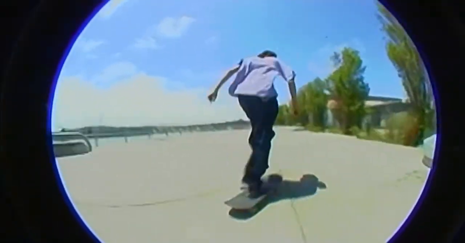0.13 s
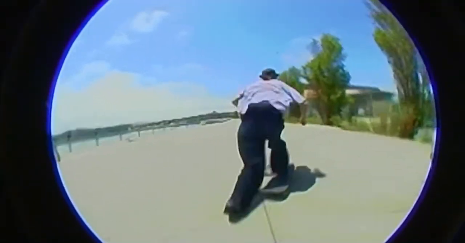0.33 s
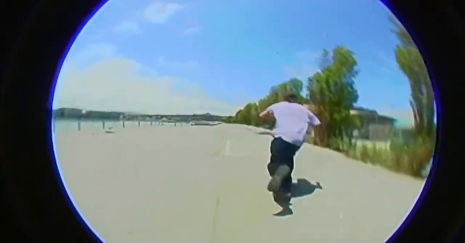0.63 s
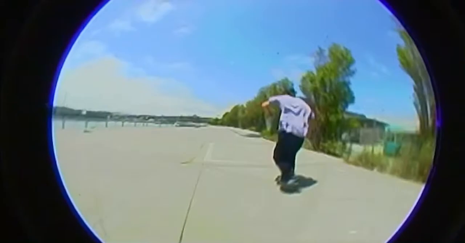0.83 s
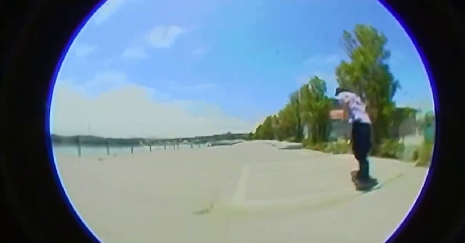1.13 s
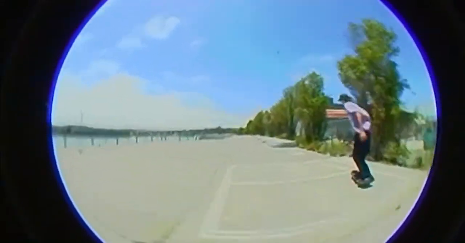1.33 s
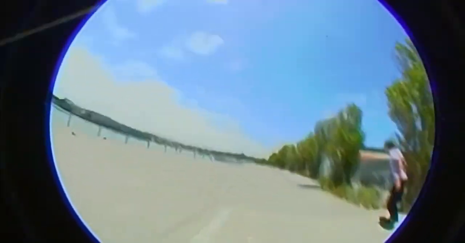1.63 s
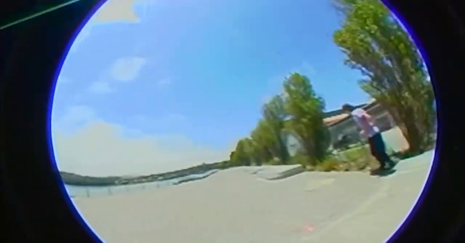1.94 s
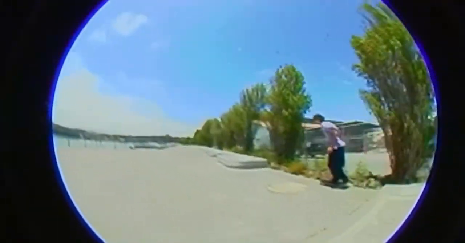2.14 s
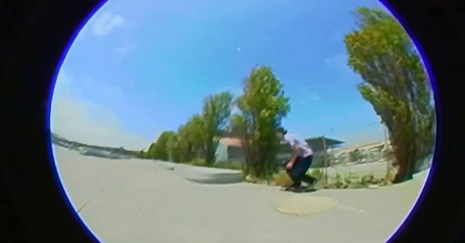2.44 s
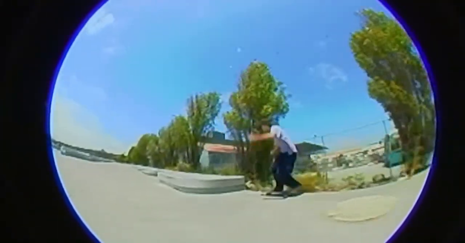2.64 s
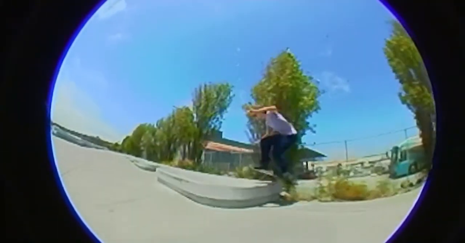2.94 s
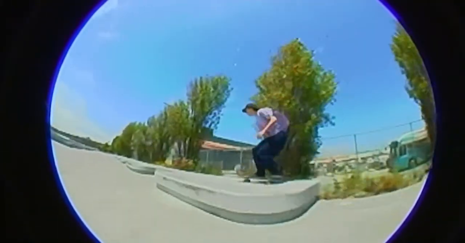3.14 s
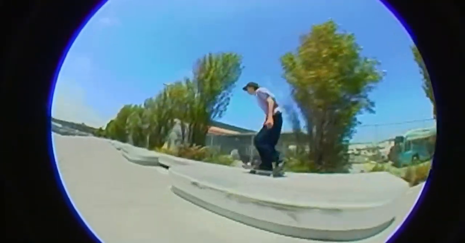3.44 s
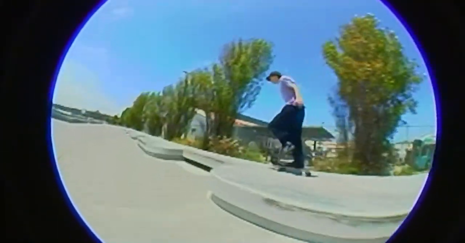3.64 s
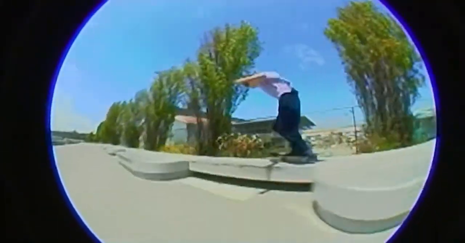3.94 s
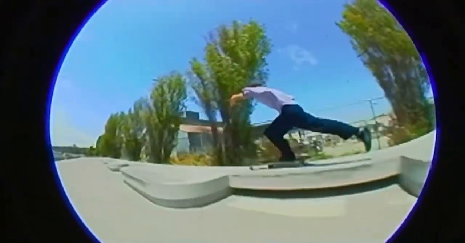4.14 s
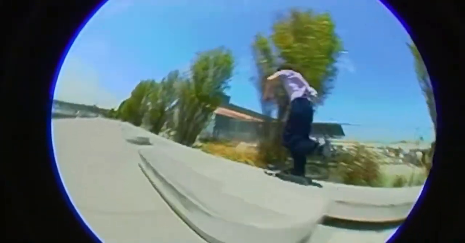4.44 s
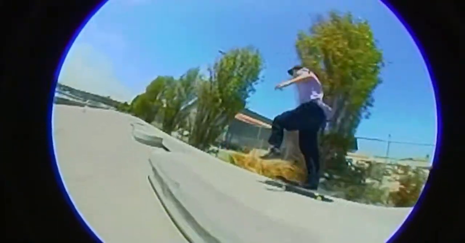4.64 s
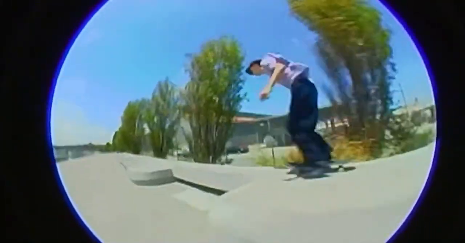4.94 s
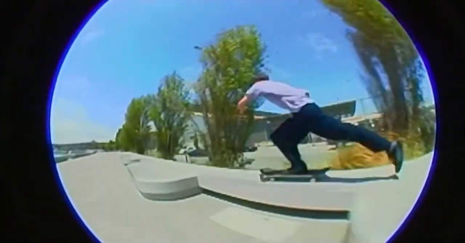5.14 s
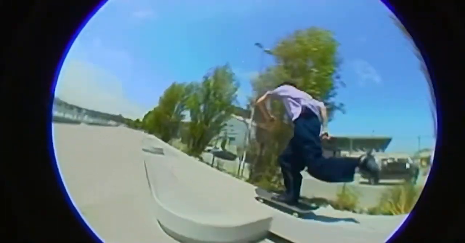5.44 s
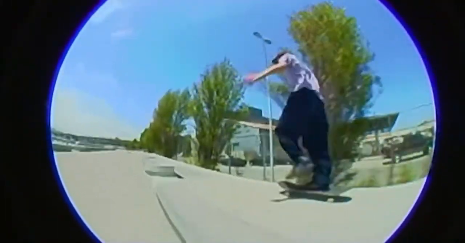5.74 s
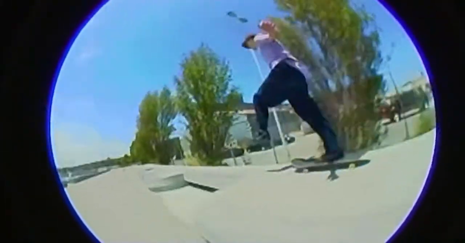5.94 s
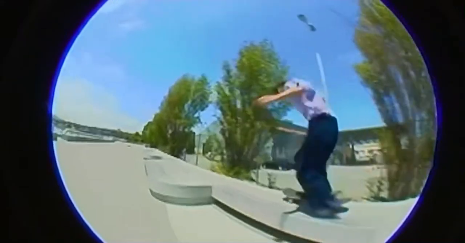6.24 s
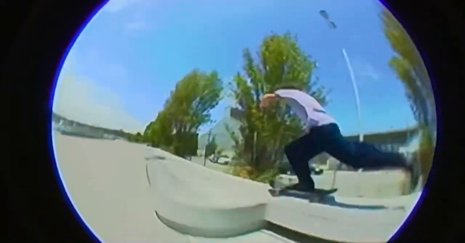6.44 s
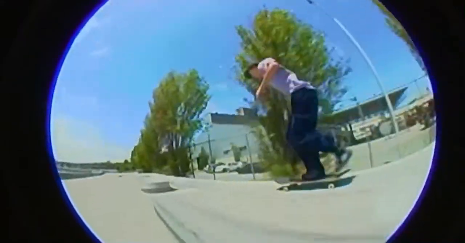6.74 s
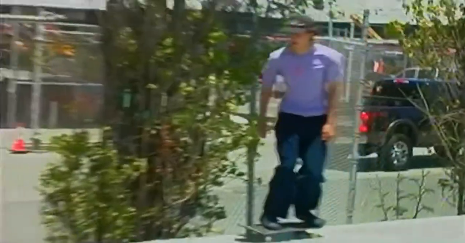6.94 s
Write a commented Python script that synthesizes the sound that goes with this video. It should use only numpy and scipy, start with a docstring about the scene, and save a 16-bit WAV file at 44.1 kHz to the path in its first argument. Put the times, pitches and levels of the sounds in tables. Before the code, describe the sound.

A close, moving microphone outdoors follows a skateboard on rough concrete, slightly to its right. From 0 to 1.4 s, low wind gusts thump while wheels drum boomily on a slab, with thin hiss, loose rattling, a few woody knocks and short metallic chirps; a joint strikes near 0.8 s. At about 1.5 s the board hops, the rumble drops out briefly, and a tight burst of loud slaps lands on a ledge. Knocks continue to 2.5 s, and a gritty surge peaks near 2.3 s as the hollow drone climbs to a growl. A lull follows, then clacks around 2.7 and 3.0 s. Another strong surge swells near 3.8 s, with knocks to 4.0 s. From 4.2 s double joint clacks come often, with a surge at 4.7 s and a hard, bright crack at 5.4 s. More pushes and clacks follow 6 s, with heavy pairs near 6.8 s and a last knock at 7.0 s.

```python
"""Outdoors on rough concrete, a microphone moves beside a rolling skateboard, the board slightly to its right.
First, gusts thump the microphone and the board drums over a slab; at about 1.5 s it hops and slaps onto a ledge.
Then it is pushed along the ledge as the roll surges and its drone climbs; from 4.2 s joints clack often again.
Grains of noise through resonances make the roll, short pushes through them the blows, sagging sines the chirps.
Filtered noise makes the air throughout, and the recorder rounds off the loudest peaks."""
import sys
import numpy as np
from scipy.fft import rfft, irfft, next_fast_len
from scipy.io import wavfile
from scipy.ndimage import uniform_filter1d, map_coordinates

SR = 44100
rng = np.random.default_rng(int(sys.argv[2]) if len(sys.argv) > 2 else 0)


def transcribe(u):
    """Save the signal u as a 16-bit wav file named by the first command-line argument.

    u: samples, shape (n,) or (channels, n), limited to [-1, 1]; the rate is SR.
    q: integer samples, one column per channel.
    """
    v = np.clip(np.atleast_2d(u).T, -1, 1)
    q = np.round(v * 32767).astype(np.int16)
    wavfile.write(sys.argv[1], SR, q)


N = 312228  # samples


def amp(db):
    """Decibels to gain."""
    return 10 ** (np.asarray(db) / 20)


def unit(x):
    """x at rms 1."""
    return x / np.sqrt(np.mean(x ** 2) + 1e-20)


def blow(x):
    """x scaled to the energy of 10 ms at rms 1."""
    energy = np.mean(np.sum(x ** 2, -1))
    return x / np.sqrt(energy / (SR / 100))


def noise_pair():
    """Two unrelated channels of white noise."""
    return rng.standard_normal((2, N))


def shape(points, hz):
    """Gain of a (Hz, dB) spectrum, read on a log frequency axis."""
    f, db = np.transpose(points)
    return amp(np.interp(np.log(hz + 1), np.log(f + 1), db))


def body(modes, hz, sign=-1):
    """Causal response of resonances; the default alternates their signs, sign=1 starts them in step."""
    total = 0
    for k, (centre, width, db) in enumerate(modes):
        resonance = 1j * hz * width / (centre ** 2 - hz ** 2 + 1j * hz * width)
        total = total + sign ** k * amp(db) * resonance
    return total


def curves(rows):
    """One value per sample for each column after the time."""
    s, *cols = np.transpose(rows)
    return [np.interp(np.arange(N) / SR, s, c) for c in cols]


def wobble(rate):
    """A smooth random curve, rate knots a second."""
    knots = rng.standard_normal(int(N * rate / SR) + 4)
    return map_coordinates(knots, [np.arange(N) * rate / SR])


def swell(s, rise, fall):
    """A smooth hump of height 1 at time s; rise and fall are its half lengths to 1/e."""
    t = np.arange(N) / SR - s
    return np.exp(-(t / np.where(t < 0, rise, fall)) ** 2)


def filtered(x, response):
    """x times a response of frequency."""
    n = x.shape[-1]
    m = next_fast_len(n + n // 2)
    return irfft(rfft(x, m) * response(np.fft.rfftfreq(m, 1 / SR)), m)[..., :n]


def stereo(pair, side_db):
    """Left and right from a shared and a differing part."""
    mid, side = pair[0], amp(side_db) * pair[1]
    return np.array([mid + side, mid - side])


def grains(rate, spread_db):
    """Two unrelated trains of tiny impacts of uneven size, rate a second."""
    hit = rng.random((2, N)) < rate / SR
    size = amp(spread_db * rng.standard_normal((2, N)))
    return hit * rng.standard_normal((2, N)) * size


def drifting(x, share, rate):
    """x with its pitch wandering by about this share, at rate knots a second."""
    clock = np.cumsum(1 + share * wobble(rate)) % (N - 1)
    return np.array([np.interp(clock, np.arange(N), side) for side in x])


def band(hz, width_hz):
    """A band of noise of rms 1 on a moving centre, its amplitude halved width_hz to either side."""
    i, q = filtered(noise_pair(), lambda f: 1 / (1 + (f / width_hz) ** 4))
    phase = 2 * np.pi * np.cumsum(hz) / SR
    return unit(i * np.cos(phase) + q * np.sin(phase))


def add(track, s, sound):
    """Mix a sound into the track at time s."""
    part = track[..., max(round(s * SR), 0):][..., :sound.shape[-1]]
    part += sound[..., :part.shape[-1]]


# air at the microphone, before its random wobble: time_s, level_db
AIR_LEVEL = [(0, -35.5), (1.45, -37), (2.5, -46), (3.5, -40), (4.0, -46), (4.6, -35.5), (5.0, -48),
             (5.8, -41), (7.08, -52)]
# gusts that thump on the microphone: peak_s, level_db (rms over 10 ms)
GUSTS = [(.092, -21), (.565, -19.5), (.725, -23), (.97, -22), (1.31, -24), (1.45, -24.5), (5.32, -26)]
# colour of the air and of the gusts: frequency_hz, relative_db
AIR = [(10, 0.0), (25, -2.5), (60, 0.5), (110, 2.0), (200, -8), (400, -64.0)]
THUMP = [(12, -10), (30, 10.0), (75, 15.5), (200, -56.0)]


def wind():
    """Moving air buffets the microphone: wavering low noise, with brief humps of deep noise as gusts."""
    level = amp(curves(AIR_LEVEL)[0] + 2.6 * wobble(14))
    air = filtered(stereo(noise_pair(), side_db=-10), lambda hz: shape(AIR, hz))
    thump = filtered(stereo(noise_pair(), side_db=-14), lambda hz: shape(THUMP, hz))
    gusts = sum(amp(db) * blow(thump * swell(s, 0.027, 0.027)) for s, db in GUSTS)
    return unit(air) * level + gusts


# colour of the thin top hiss: frequency_hz, relative_db
FIZZ = [(11000, -28), (12800, -2.5), (14600, -6), (15400, 11.5), (16000, -16)]


def fizz(board):
    """A thin, very high hiss swells with the loudness of the board in the left channel."""
    loudness = np.sqrt(np.abs(uniform_filter1d(board[0] ** 2, size=500)))  # over 11 ms
    noise = filtered(stereo(noise_pair(), side_db=-2.5), lambda hz: shape(FIZZ, hz))
    return amp(-26.0) * loudness * unit(noise)


# the rumble drops for a moment, in hops or after loud blows: middle_s, half_length_s, rumble_depth_db
LULLS = [(0, 0.067, 6), (0.816, 0.039, 3), (1.564, 0.023, 16.5), (2.544, 0.11, 8.5), (3.063, 0.036, 2.5),
         (3.292, 0.063, 2), (4.025, 0.11, 7), (5.127, 0.086, 5.5), (6.166, 0.072, 3.5), (6.997, 0.063, 4)]
# the roll swells after a lull, the more the longer and deeper it was
REBOUND_DELAY_S, REBOUND_HALF_S = 0.21, 0.09


def rebound():
    """A swell after each lull, in dB s: the lull's depth times its half length."""
    return sum(db * half * swell(s + REBOUND_DELAY_S, REBOUND_HALF_S, REBOUND_HALF_S)
               for s, half, db in LULLS)


# the rider bears down and the roll surges: peak_s, grit_rise_db, drone_rise_db
SURGES = [(1.46, 2, -9), (2.28, 9.5, 6), (2.36, 3.5, 5.5), (2.92, 3.5, -1), (3.17, -0.5, 8.5),
          (3.45, 4, -1), (3.6, 5.5, 2.5), (3.771, 8, 9), (4.709, 5, 10), (6.04, 3, 5), (6.24, 4.5, 1),
          (6.43, 3, -8)]
# dips of the treble, where grit loses 1.35 times the hiss's depth: middle_s, half_length_s, hiss_depth_db
TREBLE_DIPS = [(1.014, 0.066, 6), (1.217, 0.065, 4), (1.688, 0.075, 4.5), (2.044, 0.12, 4.5),
               (2.475, 0.088, 5.5), (3.267, 0.07, 2.5), (4.41, 0.068, 3), (5.807, 0.097, 1),
               (6.56, 0.054, 3.5)]
# scuffs that lift the hiss: middle_s, half_length_s, rise_db
SCUFFS = [(.38, .09, 3.8), (5.28, .07, 3.3)]
# wheel hiss changing with the ground, before a 1 dB cut in the mix: time_s, level_db
HISS_LEVEL = [(0, -43.5), (1.45, -42.5), (2.1, -49), (3.2, -48.5), (4.3, -45.5), (7.08, -46)]
RUMBLE_DB, GRIT_DB = -24.5, -47  # steady rolling, before lulls, surges and bumps
LULL_GRIT, LULL_HISS = 0.78, 0.42  # dB lost for each dB of rumble
SURGE_RISE_S, SURGE_FALL_S = 0.066, 0.054
SURGE_RUMBLE, SURGE_HISS = 0.16, 0.24  # dB gained for each dB of grit
REBOUND_RUMBLE = 1.6  # dB for each dB s of rebound


def roll_levels():
    """Rumble, grit and hiss in dB follow the lulls, rebounds, surges, treble dips and scuffs of the roll."""
    lull = sum(db * swell(s, half, half) for s, half, db in LULLS)
    surge = sum(db * swell(s, SURGE_RISE_S, SURGE_FALL_S) for s, db, _ in SURGES)
    scuff = sum(db * swell(s, half, half) for s, half, db in SCUFFS)
    treble_dip = sum(db * swell(s, half, half) for s, half, db in TREBLE_DIPS)
    rumble_db = RUMBLE_DB - lull + SURGE_RUMBLE * surge + REBOUND_RUMBLE * rebound()
    grit_db = GRIT_DB - LULL_GRIT * lull + surge - 1.35 * treble_dip
    hiss_db = curves(HISS_LEVEL)[0] - LULL_HISS * lull + SURGE_HISS * surge - treble_dip + scuff
    return rumble_db, grit_db, hiss_db


def rattle():
    """Loose washers in the trucks tick: random kicks gate resonant noise, louder when the grit is louder."""
    kicks = np.abs(grains(80, spread_db=2.0)[0])
    ticks = filtered(kicks, lambda hz: 1 / (1 + 1j * hz / 50))  # each kick dies away in a few ms
    metal = filtered(stereo(noise_pair(), side_db=0.0), lambda hz: body([(2700, 1360, 0)], hz) ** 2)
    _, grit_db, _ = roll_levels()
    return unit(metal * ticks) * amp(grit_db - 10.0)


# rings and chirps of the trucks: start_s, starting_pitch_hz, level_db (rms over 10 ms), t60_s
CHIRPS = [(0.221, 1850, -29, 0.07), (.226, 3490, -37.5, 0.052), (.262, 2600, -33.5, 0.029),
          (1.763, 2740, -32.5, 0.014), (2.731, 3400, -36, 0.058), (3.011, 1980, -30.5, 0.02),
          (3.231, 1215, -25, 0.023), (4.321, 3090, -32, .02), (5.047, 2800, -37, 0.039),
          (5.361, 1966, -27, 0.03), (5.3612, 4030, -36, 0.013), (5.451, 3370, -27.5, 0.01),
          (6.009, 2680, -40, 0.018), (6.068, 2440, -26.5, 0.011), (6.94, 2400, -33.5, 0.012)]


def chirps():
    """A truck sticks and slips: a short ring, its phase roughened at random, sags in pitch."""
    track, t = np.zeros(N), np.arange(SR // 8) / SR
    for s, hz, db, t60 in CHIRPS:
        roughness = .16 * np.cumsum(rng.standard_normal(len(t)))  # radians
        tone = np.sin(2 * np.pi * hz * t * (1 - 0.82 * t) + roughness)
        ring = tone * amp(-60 * t / t60) * (1 - np.exp(-t / (0.08 * t60)))
        coloured = filtered(ring, lambda f: body([(hz, 900, 0)], f))
        add(track, s, amp(db) * blow(coloured))
    return track


# joints in the concrete, struck by front then rear wheels (the pair at 6.854 s comes as he pushes), # levels as
# rms over 10 ms; the mix adds 2 dB to clacks and 3 dB to cracks: start_s, rear_delay_s, # front_knock_db,
# rear_knock_db, clack_db, crack_db, rear_clack_and_crack_over_front_db, knock_centre_hz
JOINTS = [(0.764, 0.092, -13, -25, -40.5, -47, 0, 570), (1.063, 0.063, -28, -23, -33, -44.5, 3, 630),
          (4.209, 0.11, -20.5, -21, -32.5, -31.5, -1, 600), (4.617, 0.102, -17.5, -17, -32, -47, -1, 610),
          (4.975, 0.067, -36, -30, -27, -35, -0.5, 560), (5.3615, 0.088, -11, -24, -26.5, -32.5, 1, 730),
          (6.067, 0.076, -35, -26, -27.5, -35.5, 2, 710), (6.399, 0.086, -26, -28, -35.5, -38.5, -3, 620),
          (6.7335, 0.0915, -15, -17, -31, -49, -4, 570), (6.854, 0.082, -14.5, -12.5, -31, -43, -2, 644)]
# single blows of board and feet, and wheel contacts each with its own levels (front and rear wheels # over a
# joint at 2.349 and 2.43 s), with the same levels and additions: # start_s, knock_db, clack_db, crack_db,
# knock_centre_hz
BLOWS = [(0.098, -20.5, -38.5, -56, 620), (0.325, -37, -38, -42, 525), (0.937, -19.5, -48, -52, 655),
         (1.416, -27, -34.5, -45, 550), (1.467, -21, -40.5, -52, 620), (1.5105, -10, -24.5, -38, 565),
         (1.561, -13, -34, -45, 614), (1.5895, -15, -34.5, -46, 665), (1.597, -19, -50, -57, 680),
         (1.793, -24, -44, -45, 690), (1.9367, -16, -41, -52, 620), (2.077, -16.5, -33, -49, 590),
         (2.349, -16.5, -30.5, -47, 590), (2.43, -20, -39, -55, 700), (2.48, -23, -49, -57, 620),
         (2.73, -18, -31.5, -40.5, 506), (3.007, -33, -42, -38, 560), (3.01, -31, -30, -36.5, 560),
         (3.014, -20, -45, -45, 540), (3.022, -20, -40, -48, 706), (3.033, -40, -37.5, -42, 550),
         (3.103, -17, -45, -53, 580), (3.138, -24, -39.5, -55, 636), (3.807, -32, -33, -35.5, 640),
         (3.812, -28, -31.5, -40, 660), (3.891, -20.5, -35, -44, 600), (3.92, -18, -49, -52, 590),
         (4.024, -20.5, -36, -45.5, 820), (4.792, -17, -40, -57, 620), (5.13, -20.5, -50, -62, 680),
         (5.458, -18, -45, -54, 680), (5.485, -19, -38, -56, 580.3), (6.185, -18.5, -43, -54, 700),
         (6.43, -21, -42, -52, 620), (7.0103, -22.5, -31, -35, 650)]


def impacts():
    """Every contact as (s, knock dB, clack dB, crack dB, centre Hz): two for a joint, one for a blow."""
    contacts = list(BLOWS)
    for s, delay, front, rear, clack, crack, extra, hz in JOINTS:
        contacts.append((s, front, clack, crack, hz))
        contacts.append((s + delay, rear, clack + extra, crack + extra, hz))
    return contacts


def struck(modes):
    """Every blow lands elsewhere: resonances shift and change weight at random."""
    chance = rng.standard_normal((len(modes), 2))
    return [(c * (1 + 0.025 * a), w, db + 1.4 * b) for (c, w, db), (a, b) in zip(modes, chance)]


def contact(t, t60, tail_db, tail_t60, side_db):
    """The force of one blow: a crunch of noise with a soft onset of about a millisecond, and a weaker rattle."""
    after = np.maximum(t, 0)
    crunch = stereo(rng.standard_normal((2, len(t))), side_db) * amp(-60 * after / t60)
    tail = stereo(rng.standard_normal((2, len(t))), side_db=-18) * amp(tail_db - 60 * after / tail_t60)
    knots_s = np.linspace(t[0], t[-1], num=40)
    chatter = amp(1.3 * np.interp(t, knots_s, rng.standard_normal(size=40)))
    onset = 1 / (1 + np.exp(-t / 0.00075))
    return (crunch + tail * chatter) * onset


# resonances of the deck, and of wheels and trucks: centre_hz, width_hz, relative_db
DECK = [(279, 164, -6.5), (462, 65, 3), (640, 93, -2), (743, 87, -1), (1015, 100, -5.5), (1330, 430, -19)]
TRUCK = [(1270, 420, -3), (1740, 390, 0.5), (2200, 550, -1.5), (2810, 710, -0.5), (3400, 490, -1.5),
         (3840, 520, -7)]
# colours of deck knock, wheel clack and stone crack: frequency_hz, relative_db
KNOCK = [(80, 3), (250, 0), (500, 1.5), (900, 1.5), (1300, -4), (1900, -15.5), (5000, -57)]
CLACK = [(500, -30), (1200, 1), (2000, 0.5), (3600, -2), (4600, -13), (9000, -41)]
CRACK = [(1500, -14), (4000, 1.5), (6000, 2), (8500, -3.5), (11000, -2), (14000, 1), (16000, -2)]
KNOCK_HZ = 598  # pivot of the tilt
KNOCK_TILT_DB = 26  # dB per octave of tilt, for each octave the knock's centre lies above the pivot


def hits():
    """Each blow knocks the deck, rings wheels and trucks, and cracks on the stone."""
    track = np.zeros((2, N))
    t = np.arange(SR // 8) / SR - 1 / 200  # starts 5 ms before the blow
    # the deck takes one solid push; wheels and trucks take an instant kick
    push = blow(np.exp(-((t - .0008) / 0.00025) ** 2))
    snap = blow(1. * (np.arange(len(t)) == np.argmax(push)))
    for s, knock_db, clack_db, crack_db, centre_hz in impacts():
        # a higher centre favours the deck's upper resonances
        tilt_db = 4.5 + KNOCK_TILT_DB * np.log2(centre_hz / KNOCK_HZ)
        deck = struck([(c, .9 * w, db + tilt_db * np.log2(c / KNOCK_HZ)) for c, w, db in DECK])
        truck = struck(TRUCK)
        crunch = blow(contact(t, t60=0.043, tail_db=-14, tail_t60=0.086, side_db=-30.0))
        force = push + amp(2.5) * crunch
        knock = filtered(force, lambda hz: body(deck, hz, sign=0.98) * shape(KNOCK, hz))
        wheel_crunch = blow(contact(t, t60=0.027, tail_db=-11.5, tail_t60=0.098, side_db=-17.0))
        kick = snap + amp(3.5) * wheel_crunch
        clack = filtered(kick, lambda hz: body(truck, hz) * shape(CLACK, hz))
        scrape = contact(t, t60=0.013, tail_db=-11.0, tail_t60=0.1, side_db=0.5)
        crack = filtered(scrape, lambda hz: shape(CRACK, hz))
        bright = amp(clack_db + 2.0) * blow(clack) + amp(crack_db + 3.0) * blow(crack)
        add(track, s + t[0], amp(knock_db) * blow(knock) + bright * amp([[-1.4], [1.2]]))
    return track


# long surges in which the drone climbs: middle_s, climb_hz
GLIDES = [(2.27, 80.1), (3.771, 99.9), (4.64, 85.2)]
DRONE_HZ, DRONE_DB = 461.7, -8  # at rest; level against the rumble
CLIMB_LEAD_S, CLIMB_LAG_S, SETTLE_S = .2, .16, .13
SING_HALF_S = 0.15  # how long it sings around the peak of a surge
REBOUND_DRONE = 17  # dB for each dB s of rebound


def drone_glide():
    """The deck's drone climbs and settles, its level following surges and rebounds. Gives Hz and dB."""
    t = np.arange(N) / SR
    corners_s = [-CLIMB_LEAD_S, CLIMB_LAG_S, CLIMB_LAG_S + SETTLE_S]
    climb = sum(hz * np.interp(t - s, corners_s, [0, 1, 0]) for s, hz in GLIDES)
    sing = sum(db * swell(s, SING_HALF_S, SING_HALF_S) for s, _, db in SURGES)
    return DRONE_HZ + climb, DRONE_DB + sing + REBOUND_DRONE * rebound()


GROWL_RATIO = 1.37  # centre of the growl over the drone
SPREAD_HZ, BROKEN_AT_REST = 200, 0.13  # scale of climb that breaks up the drone; growl's share at rest


def drone_band(drone_hz):
    """The drone is narrow at rest and breaks into a broad, higher growl as it climbs."""
    climb = np.abs(drone_hz - DRONE_HZ)
    broken = np.clip((climb + BROKEN_AT_REST * SPREAD_HZ) / (climb + SPREAD_HZ), 0, 1)
    narrow = band(drone_hz, width_hz=49)
    growl = band(GROWL_RATIO * drone_hz, width_hz=105)
    return np.sqrt(1 - broken) * narrow + np.sqrt(broken) * growl


BRIGHT_HZ, BRIGHT_GRIT = 620, 0.24  # where the upper rumble starts; its dB for each dB of grit


def brightened(rumble, grit_db):
    """The rumble opens up as the grit gets louder and dulls as it fades."""
    upper = filtered(rumble, lambda hz: 1 - 1 / (1 + (hz / BRIGHT_HZ) ** 8))
    return rumble + upper * (amp(BRIGHT_GRIT * (grit_db - GRIT_DB)) - 1)


# stretches where the deck's upper resonance howls: middle_s, half_length_s, level_against_rumble_db
HOWLS = [(.9, .2, -6), (2.295, .1, -4.5), (5.623, 0.33, -6.5), (6.747, 0.39, -6)]


def howl(rumble_db):
    """A higher resonance of the deck, as a narrow band of noise, howls for a while."""
    gain = sum(amp(db) * swell(s, half, half) for s, half, db in HOWLS)
    return band(np.full(N, 740), width_hz=46) * gain * amp(rumble_db)


# the slab booms more than the ledge, and the stereo width of the rolling varies with time;
# each layer trims the width: time_s, boom_against_rumble_db, width_db
PATH = [(0, -6, -4), (0.55, -5, -14), (0.9, -5, 4.5), (1.4, -3.5, -7), (2.0, -3.5, -7), (2.25, -14.5, 2.5),
        (3.6, -8, 4.5), (5.8, -6.5, 0), (7.08, -12, -9)]
# colours of rumble, grit and hiss: frequency_hz, relative_db
RUMBLE = [(30, -20), (200, -6.5), (480, -1), (590, -4.5), (760, -3.5), (900, -13.5), (1100, -14.5),
          (2000, -36.5), (4000, -56)]
GRIT = [(500, -37), (1000, 8.5), (1400, 8.5), (2000, -0.5), (2500, -5), (3300, 3), (3800, -6), (4600, -45),
        (9000, -60)]
HISS = [(2000, 12.5), (4000, 3), (5800, 3.5), (8000, 1.5), (11500, 1), (13000, -15), (16000, -10)]
# coarse stones rattling wheels and baseplates: centre_hz, width_hz, relative_db
CLATTER = [(870, 100, 2.5), (1002, 126, 2.5), (1270, 240, -4), (1523, 140, -5), (2090, 680, -17)]
# colour of that clatter: frequency_hz, relative_db
COARSE = [(300, -24), (750, -5.5), (2200, 2.0), (4500, -6)]
CLATTER_DB = 2.5  # against the grit, before bumps and rebounds


def rolling():
    """The stones of the concrete drum on the deck, rattle and crunch under the wheels and hiss."""
    rumble_db, grit_db, hiss_db = roll_levels()
    drone_hz, drone_db = drone_glide()
    boom_db, width_db = curves(PATH)
    bumps = wobble(55)  # rough spots lift all bands together

    drumming = stereo(grains(800, spread_db=1.2), side_db=width_db - 17.0)
    spread = unit(filtered(drumming, lambda hz: shape(RUMBLE, hz)))
    # each resonance of the deck swells, fades and wanders on its own as the load shifts
    stones = stereo(grains(1200, spread_db=1.1), side_db=width_db - 23.0)
    deck = 0
    for mode in DECK:
        ring = filtered(stones, lambda hz: body([mode], hz) * shape(KNOCK, hz))
        deck = deck + drifting(ring, share=.035, rate=11) * amp(1.6 * wobble(9))
    drone = drone_band(drone_hz)
    low_noise = stereo(noise_pair(), side_db=width_db - 13.5)
    boom = unit(filtered(low_noise, lambda hz: body([(267.4, 245, 0)], hz) ** 2))
    # drumming, drone and boom share the power of the rumble
    rumble = unit(spread + unit(deck)) + amp(drone_db) * drone + amp(boom_db) * boom
    rumble = rumble / np.sqrt(1 + amp(drone_db) ** 2 + amp(boom_db) ** 2)
    rumble = rumble * amp(rumble_db + 1.07 * bumps)

    crunch = stereo(grains(900, spread_db=0.5), side_db=width_db - 9.5)
    grit = unit(filtered(crunch, lambda hz: shape(GRIT, hz)))
    grit = grit * amp(grit_db + 1.5 * bumps + 0.42 * wobble(140)) * amp([[-.7], [.7]])

    coarse = stereo(grains(300, spread_db=-0.5), side_db=width_db - 15)
    coarse = filtered(coarse, lambda hz: body(CLATTER, hz) * shape(COARSE, hz))
    clatter = unit(drifting(coarse, share=.03, rate=14))
    clatter = clatter * amp(grit_db + CLATTER_DB + 3.5 * bumps + 3.5 * rebound())

    fine = stereo(grains(14000, spread_db=2.5), side_db=0.44 * width_db - 5.5)
    hiss = unit(filtered(fine, lambda hz: shape(HISS, hz)))
    hiss = hiss * amp(hiss_db - 1.0 + 0.95 * bumps) * amp([[-.8], [.8]])
    return brightened(rumble, grit_db) + howl(rumble_db + bumps) + clatter + grit + hiss


def scene():
    """The board is a little to the right, so its sound reaches that port of the microphone first."""
    board = rolling() + rattle() + hits() + chirps()
    lag = 2.7e-5  # s between the ports
    ports = lambda hz: np.exp(-1j * np.pi * hz * lag * np.array([[1], [-1]]))
    return wind() + filtered(board + fizz(board), ports) * amp([[-.25], [.25]])


TOP_HZ = 16000


def record(dry):
    """The recorder rounds off the peaks and keeps nothing above its band limit."""
    top, hardness = .39, 5
    rounded = dry / (1 + np.abs(dry / top) ** hardness) ** (1 / hardness)
    return filtered(rounded, lambda hz: hz < TOP_HZ)


dry = scene()
out = record(dry)
transcribe(out)
```